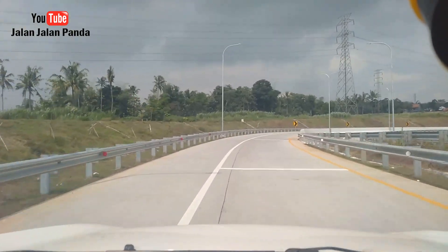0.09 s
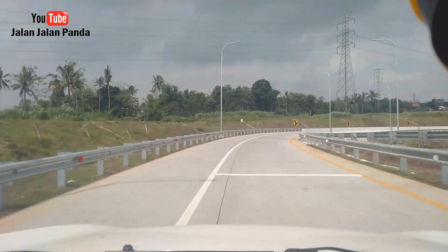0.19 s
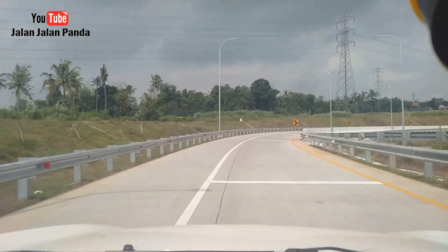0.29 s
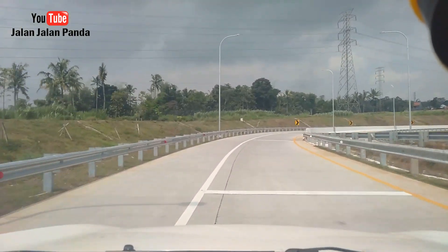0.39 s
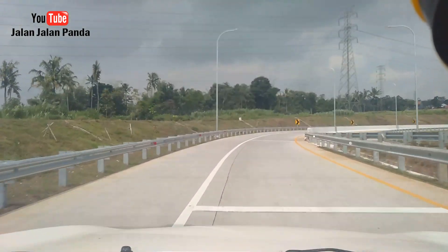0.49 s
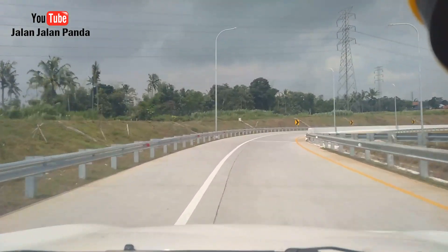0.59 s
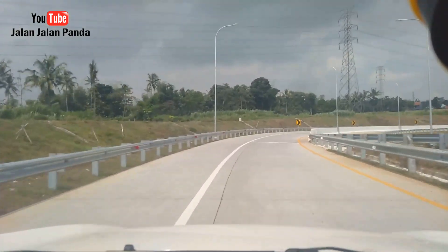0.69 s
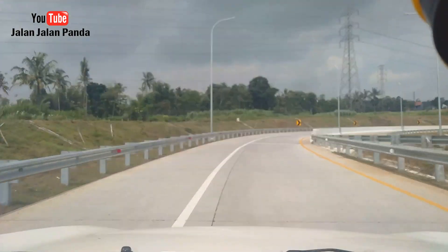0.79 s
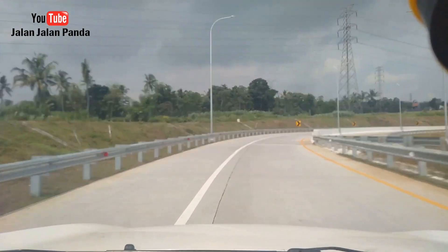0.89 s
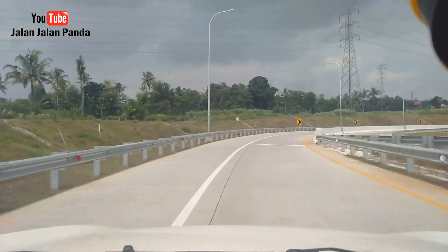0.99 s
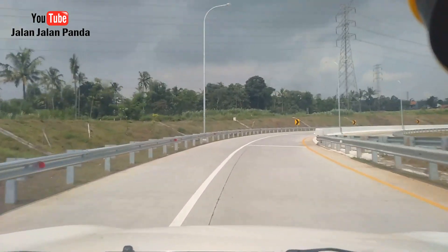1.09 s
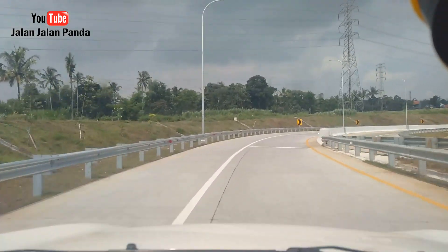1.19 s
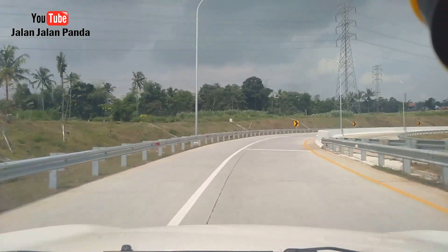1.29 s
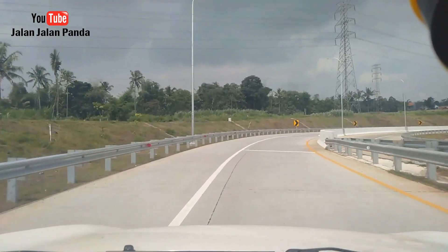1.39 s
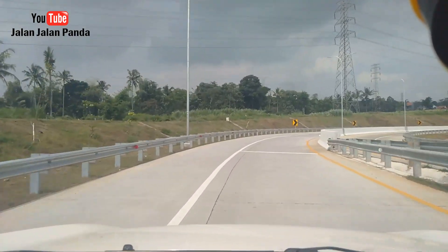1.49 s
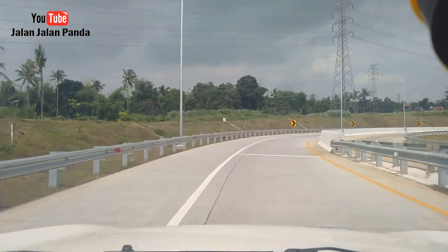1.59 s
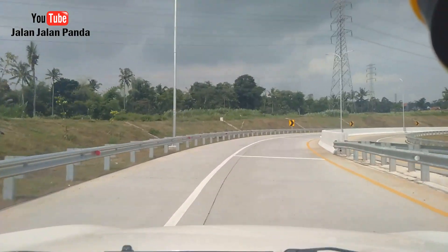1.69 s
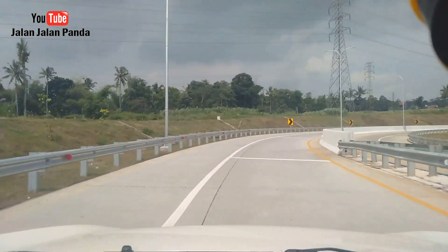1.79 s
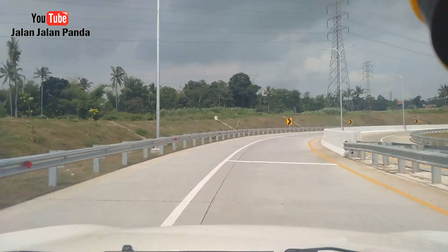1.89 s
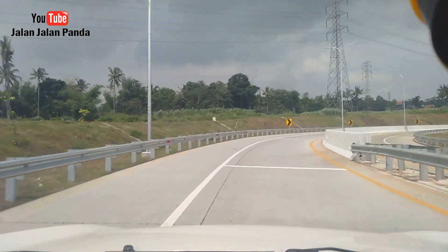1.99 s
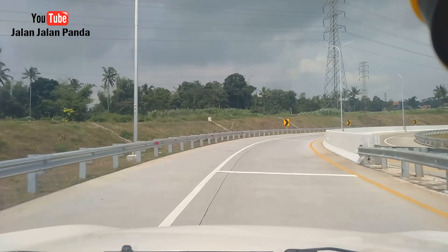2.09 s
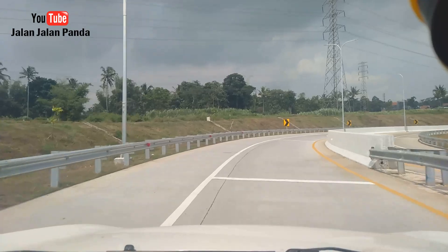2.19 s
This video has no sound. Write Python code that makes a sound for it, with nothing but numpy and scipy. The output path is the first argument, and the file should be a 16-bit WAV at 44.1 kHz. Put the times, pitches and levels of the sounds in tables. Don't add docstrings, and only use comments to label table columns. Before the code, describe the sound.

Car cabin road noise on concrete, with a double thump and trim rattle over a raised strip

```python
import sys
import numpy as np
from scipy import signal
from scipy.io import wavfile
from scipy.ndimage import uniform_filter1d

SR = 44100
rng = np.random.default_rng(int(sys.argv[2]) if len(sys.argv) > 2 else 0)


def volts(x):
    e = np.asarray(x, float) / 20
    return 10 ** e


def unload_wav(signal):
    wavfile.write(
        sys.argv[1],
        SR,
        np.round(np.clip(np.atleast_2d(signal).T, -1, 1) * 32767).astype(np.int16),
    )


N = 99225
T = np.arange(N) / SR

# frequency [Hz], density [dB per Hz].
ROAR_SPECTRUM = [(80, 2.5), (130, -1.5), (270, -16), (500, -13.5), (800, -22), (1300, -31), (2300, -36),
                 (3200, -71)]
# centre [Hz], width [Hz], level [dB].
CABIN_MODES = [(131, 13.4, -49), (207, 45, -59), (279.7, 11.5, -54.5), (492, 23, -56), (640, 29, -61.5),
               (1190, 61, -66)]
# centre [Hz], width [Hz], level [dB].
BODY_MODES = [(14.3, 14.2, 0.5), (26.42, 8, 2), (48.1, 13.7, 0), (69.1, 13, -9)]
# time [s], level of the body shake [dB].
ROUGHNESS = [(0, -31), (.32, -30.5), (.45, -30.5), (.62, -27.5), (.79, -26.5), (.9, -28), (1.3, -35.5),
             (1.42, -33), (1.54, -37), (1.67, -34), (1.9, -32.5), (2.05, -31.5), (2.25, -33)]
# time [s], frequency [Hz], level [dB].
TREAD_WHINE = [(0, 640, -59), (.17, 647, -48), (0.401, 644.5, -63), (.53, 631.6, -50.5), (.75, 635, -60.5),
               (.9, 640, -45.5), (1.2, 633.6, -54.5), (1.4, 647.6, -55.5), (1.7, 646, -56.5),
               (1.82, 642, -63), (1.92, 640, -51.5), (2.12, 647, -51.5), (2.25, 638, -57.5)]
# centre [Hz], width [Hz], level [dB].
AIR_BANDS = [(3170, 540, -100), (7360, 1400, -77.5), (10700, 4000, -77.5), (14400, 2500, -74)]
# time [s], peak level [dB].
TICK_TIMES = [
    (0.0458, -47),
    (0.3222, -52),
    (0.4708, -51),
    (0.5322, -38),
    (0.6035, -50),
    (0.6843, -53),
    (0.9517, -42),
    (0.9667, -36),
    (1.1358, -48.5),
]
# centre [Hz], width [Hz], level [dB].
TICK_MODES = [(4870, 1500, -5), (6000, 710, -15), (7200, 760, 3), (8800, 1300, -11), (13500, 1600, -15)]
# crest time [s], crest level [dB], frequency [Hz], rise [s], T60 [s].
BODY_BOOMS = [(0.878, -19, 28.4, 0.058, 0.26), (.919, -14.5, 30, 0.015, 0.16),
              (0.954, -13, 49.6, 0.01, 0.044), (.985, -1, 35.6, 0.019, 0.13),
              (1.011, -14, 72.6, 0.015, 0.16), (1.03, -7.5, 22.7, 0.029, 0.16), (1.08, -10, 25, 0.03, 0.86),
              (1.157, -10, 55.5, .012, 0.1), (1.194, -4, 53.5, 0.014, 0.21), (1.4, -24, 100, 0.0071, 0.19),
              (1.262, -9, 55, 0.0067, 0.22), (1.308, -18.5, 27.1, 0.031, 0.81),
              (1.372, -10, 43.2, 0.017, 0.098), (0.753, -16.5, 48.7, 0.0096, 0.072),
              (1.605, -19.5, 50, 0.021, 0.17), (.527, -13.5, 23.1, 0.023, 0.2),
              (0.2655, -19, 29.06, 0.035, 0.92), (1.497, -18.5, 27.4, 0.072, 0.33),
              (1.898, -18, 25.5, 0.033, 0.3), (1.278, -25, 120, 0.016, 0.25),
              (2.01, -30.5, 145, 0.038, 0.41), (.103, -24.5, 50, 0.028, 0.25), (.227, -20, 34, .015, 0.1),
              (.22, -31.5, 128, 0.058, 0.27), (.367, -23.5, 36, 0.021, 0.18), (.65, -21, 46, 0.022, .25),
              (1.41, -19, 27, 0.024, 0.24), (1.45, -29, 70, 0.027, 0.43), (1.7, -22.5, 52, 0.019, .2),
              (1.73, -26, 51.2, .04, 0.55), (2.15, -22.5, 44.6, .04, 0.38), (1.1, -16.5, 52, 0.0064, 0.11),
              (.8, -34.5, 140, .04, 0.33), (1.18, -24, 150, .02, .3), (1.56, -29, 75, .03, .3),
              (1.79, -23, 30, .04, .4), (1.75, -30, 72, .03, .3), (.41, -31, 135, .02, .2)]
# peak time [s], level [dB], rise [s], T60 [s], thud relative to rattle [dB].
TRIM_RATTLES = [(0.953, -58, .004, 0.061, -7), (0.971, -60, 0.008, 0.37, 1), (1.012, -43, 0.005, 0.075, 0),
                (1.024, -48, 0.0072, 0.12, -1), (0.986, -56, 0.01, 0.12, 14),
                (1.049, -70, 0.0037, 0.28, -12), (1.164, -64, 0.02, 0.31, -15),
                (1.183, -66.5, 0.012, 0.25, 17.5), (1.326, -66, 0.005, 0.3, 15),
                (1.228, -61.5, 0.024, 0.37, -13), (1.259, -51.5, .002, 0.13, 4.5),
                (1.285, -62, 0.004, 0.12, -25), (1.347, -63, 0.015, 0.13, 8),
                (1.475, -60.5, 0.0017, 0.15, 4), (1.577, -59.5, 0.0017, 0.11, 9),
                (0.389, -60.5, 0.0022, 0.13, 8.5), (0.76, -65, .006, 0.12, 13),
                (.83, -70.5, 0.0046, .1, 15)]
# peak time [s], level [dB], rise [s], T60 [s].
HARD_KNOCKS = [(.97, -66, .004, .3), (.988, -59, .008, .1), (1.011, -41, .002, 0.11),
               (1.03, -53, .006, 0.11), (1.055, -62, .006, .12), (1.22, -64, .01, .4),
               (1.262, -67, .01, 0.18), (1.283, -60, .01, .13), (1.35, -73, .006, .1),
               (1.58, -72, .006, .15), (.39, -73, .006, .15)]
# centre [Hz], width [Hz], level [dB].
TRIM_MODES = [(3460, 750, -2), (4760, 1300, -5), (6760, 1700, 6), (7670, 700, 8.5), (8470, 850, 1.5),
              (11500, 10000, -12)]
# centre [Hz], width [Hz], level [dB].
THUD_MODES = [(348, 160, 12), (640, 106, 9), (873, 59, 11), (1197, 230, 3.5), (1754, 700, -3.5),
              (2670, 700, -6.5)]
# centre [Hz], width [Hz], level [dB].
SHELL_MODES = [(3420, 800, 4), (4280, 800, -2), (9200, 520, -23), (13000, 680, -7)]
# centre [Hz], width [Hz], level [dB].
TOP_MODES = [(10800, 700, -8), (13500, 620, -1), (14500, 900, -2), (15400, 700, 4)]
# centre [Hz], width [Hz], level [dB].
METAL_MODES = [(2935, 60, -1), (3400, 60, 5), (3547, 60, 5), (4500, 60, -3), (7600, 80, 1), (8350, 70, -1),
               (10800, 150, -7), (13500, 180, 2), (15330, 150, 2)]
# time [s], level [dB], ring
# frequency [Hz].
SLAPS_AND_KNOCKS = [(.938, -22.5, 547), (.95, -20.5, 517), (1.15, -33, 445), (1.172, -33, 510),
                    (.998, -34.5, 520), (1.005, -33.5, 1200), (1.012, -41, 1560), (0.97, -33.5, 630),
                    (.602, -36.5, 540), (.75, -37, 250), (1, -32, 340), (1.017, -32, 740), (1.04, -31, 238),
                    (1.191, -30, 264), (1.215, -28, 225), (1.345, -39, 496)]
# peak time [s], level [dB], rise [s], T60 [s].
SHUDDER_TIMES = [
    (0.97, -24, 0.023, 0.7),
    (1.1854, -25, 0.024, 0.34),
    (1.25, -38.5, 0.017, 0.23),
    (1.4, -37, 0.0122, 0.22),
    (1.05, -36.5, 0.019, 0.24),
    (0.92, -38, 0.015, 0.16),
    (1.09, -36, 0.018, 0.47),
]
# centre [Hz], width [Hz], level [dB].
CHASSIS_MODES = [(98.4, 42, 6.5), (174.4, 59, -3.5), (258.5, 59, -6), (476, 184, -17), (900, 350, -26.5),
                 (1860, 930, -38)]
# middle [s], half length [s].
TREBLE_GAPS = [(.248, .009), (.712, .008), (.877, .01), (1.199, .006), (1.336, .008), (1.757, .009),
               (1.805, .01), (2.248, .011)]
# middle [s], half length [s].
TOP_GAPS = [(.265, .035), (.35, .02), (.45, .03), (.54, .04), (.68, .035), (.79, .015), (.905, .055),
            (1.13, .04), (1.37, .012), (1.485, .06), (1.65, .035), (1.78, .04), (1.9, .05), (2.0, .015)]
# middle [s], frequency [Hz], level [dB].
GAP_TONES = [(.246, 3250, -72), (.875, 2600, -70), (1.2, 7850, -65), (1.334, 7200, -67)]


def unit(x):
    return x / np.sqrt(np.mean(x ** 2))


def noise():
    return rng.standard_normal(N)


def band(x, hz, width):
    return signal.lfilter(*signal.iirpeak(min(hz, SR / 2.2), hz / width, fs=SR), x)


def body_of(x, modes):
    out = 0
    for k, (hz, width, db) in enumerate(modes):
        out = out + (-1) ** k * volts(db) * band(band(x, hz, width), hz, width * 2)
    return out


def steady(modes):
    led_in = np.tile(noise(), 2)[N // 2:]
    return unit(body_of(led_in, modes)[-N:])


def walk(rate):
    hold = int(SR / rate)
    levels = np.repeat(rng.standard_normal(N // hold + 1), hold)
    return 1.3 * uniform_filter1d(uniform_filter1d(levels, hold), hold)[:N]


def swell(at, rise, t60):
    d = T - at
    growth = np.exp(-(np.minimum(d, 0) / rise) ** 2)
    decay = volts(-60 * np.maximum(d, 0) / t60)
    return np.where(d < 0, growth, decay)


def swells(events):
    return sum(volts(db) * swell(s, rise, t60) for s, db, rise, t60 in events)


def duck(x, hz, db):
    treble = signal.sosfiltfilt(signal.butter(8, hz, "high", fs=SR, output="sos"), x)
    return x - treble * (1 - volts(db))


def tyre_roar():
    swell_db, flicker_db = .3, 1.12
    slow = walk(2.6)
    table_hz, table_db = np.array(ROAR_SPECTRUM).T
    out = 0
    for hz in 85 * 2 ** np.arange(0, 5.3, .4):
        db = np.interp(np.log(hz), np.log(table_hz), table_db)
        db = db + swell_db * slow + flicker_db * walk(14)
        out = out + volts(db) * band(band(noise(), hz, hz / 2), hz, hz / 2)
    return volts(-37) * duck(unit(out), 2550, -4)


def cabin_ring():
    flicker_db = 1.5
    return sum(volts(db + flicker_db * walk(7.87)) * unit(band(noise(), hz, width))
               for hz, width, db in CABIN_MODES)


def road():
    rough_db = uniform_filter1d(np.interp(T, *np.array(ROUGHNESS).T), size=2000)
    roar = tyre_roar() + cabin_ring()
    shake = sum(volts(db) * steady([(hz, width, 0)]) for hz, width, db in BODY_MODES)
    roar_follow = 0.061
    roar_gain = volts(roar_follow * (rough_db - rough_db.mean()))
    return volts(rough_db - 2.0) * shake + roar_gain * roar


def whine():
    wobble_hz, flicker_db = 7, 4
    s, hz, db = np.array(TREAD_WHINE).T
    turns = np.cumsum(np.interp(T, s, hz) + wobble_hz * walk(24.96)) / SR
    level = volts(np.interp(T, s, db) + flicker_db * walk(12))
    return level * np.sqrt(2) * np.sin(2 * np.pi * turns)


def air_hiss():
    flicker_db = .8
    hiss = sum(volts(db) * steady([(hz, width, 0)]) for hz, width, db in AIR_BANDS)
    return volts(flicker_db * walk(9.1)) * hiss


def ticks():
    rise_s, t60_s = .0004, 0.0074
    taps = sum(volts(db - 11.5) * swell(s + 0.0012, rise_s, t60_s) for s, db in TICK_TIMES)
    return steady(TICK_MODES) * taps


def body_booms():
    return sum(volts(db) * swell(s, rise, t60) * np.cos(2 * np.pi * hz * (T - s))
               for s, db, hz, rise, t60 in BODY_BOOMS)


def trim_contacts():
    contacts_per_s, spread_db = 14000, 1
    struck = rng.random(N) < contacts_per_s / SR
    return struck * volts(spread_db * rng.exponential(size=N)) * np.sign(noise())


def trim_rattle():
    hits = trim_contacts()
    scale = 1 / np.sqrt(np.mean(body_of(hits, TRIM_MODES) ** 2))
    shake = swells([(s, db, rise, t60) for s, db, rise, t60, _ in TRIM_RATTLES])
    thud = swells([(s, db + thud_db, rise, t60) for s, db, rise, t60, thud_db in TRIM_RATTLES])
    blow = volts(-32) * swell(1.012, 0.004, .1)
    rattle = body_of(shake * hits, TRIM_MODES)
    shell = volts(3) * body_of(shake * rng.permutation(hits), SHELL_MODES)
    bright = volts(5.5) * body_of(swells(HARD_KNOCKS) * hits, TOP_MODES)
    metal = body_of(blow * hits, METAL_MODES)
    dull = volts(10.5) * body_of(thud * hits, THUD_MODES)
    return scale * (rattle + shell + bright + metal + dull)


def slaps_and_knocks():
    rise_s, t60_s, partner_ratio, partner_db = 0.0026, .05, .87, -6
    out = 0
    for s, db, hz in SLAPS_AND_KNOCKS:
        phase = 2 * np.pi * hz * (T - s)
        tone = np.sin(phase) + volts(partner_db) * np.sin(phase * partner_ratio)
        out = out + volts(db) * swell(s + 0.004, rise_s, t60_s) * tone
    return out


def chassis_shudder():
    return swells(SHUDDER_TIMES) * unit(body_of(noise(), CHASSIS_MODES))


def scene():
    surroundings = road() + whine() + air_hiss()
    loose_parts = ticks() + trim_rattle()
    strip = body_booms() + slaps_and_knocks() + chassis_shudder()
    return (surroundings + loose_parts + strip)[None]


def top_cut(x):
    return signal.sosfilt(signal.butter(12, 15970, fs=SR, output="sos"), x)


def record(dry):
    x = np.tanh(dry)
    x = signal.sosfilt(signal.ellip(10, .3, 70, 15700, fs=SR, output="sos"), x)
    gap = sum(np.exp(-((T - s) / half_s) ** 4) for s, half_s in TREBLE_GAPS)
    lid = sum(np.exp(-((T - s) / half_s) ** 4) for s, half_s in TOP_GAPS)
    tone_half_s = .016
    kept = sum(volts(db) * np.exp(-((T - s) / tone_half_s) ** 4) * np.sin(2 * np.pi * hz * T)
               for s, hz, db in GAP_TONES)
    x = duck(x, 2600, -19 * gap)
    x = duck(x, 14000, -34 * lid)
    return top_cut(x + kept)


dry = scene()
out = record(dry)
unload_wav(out)
```